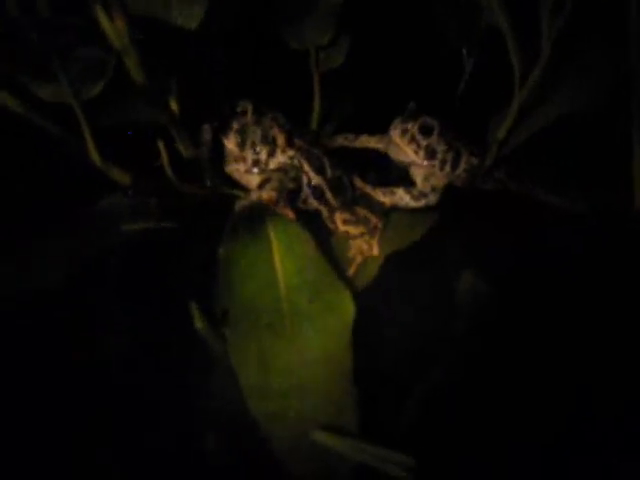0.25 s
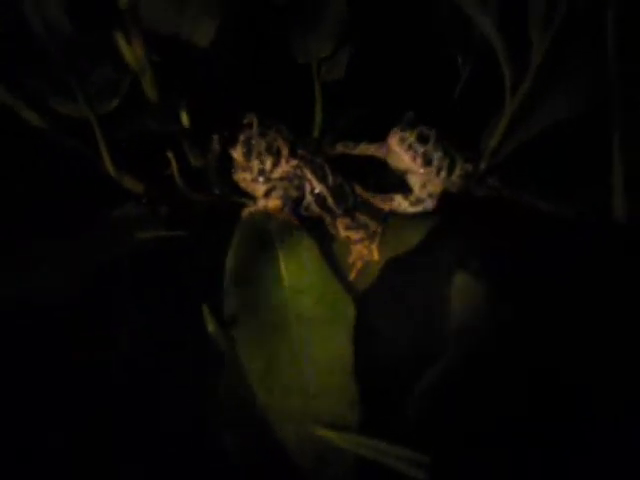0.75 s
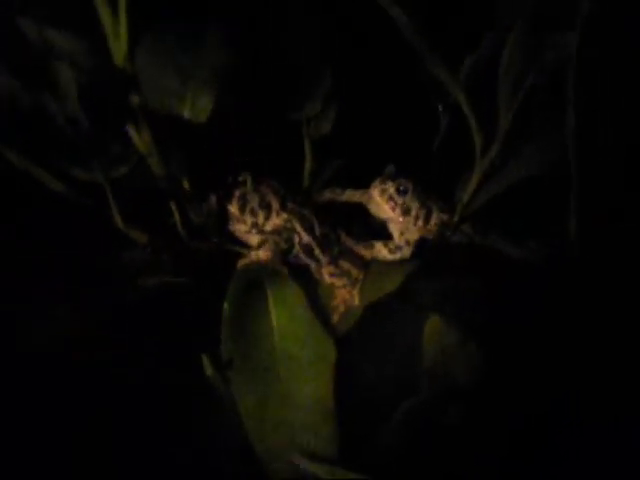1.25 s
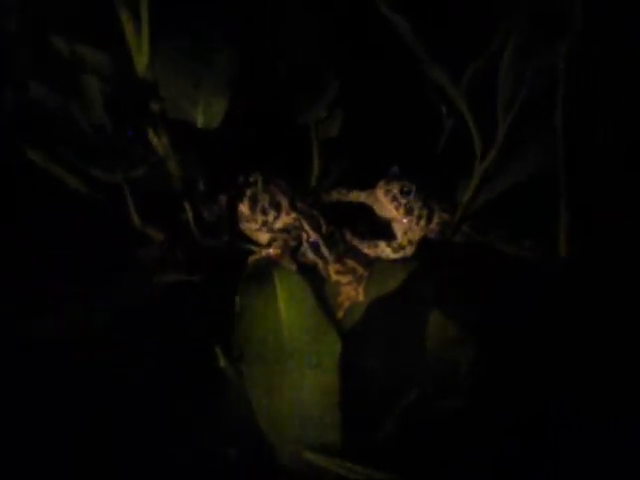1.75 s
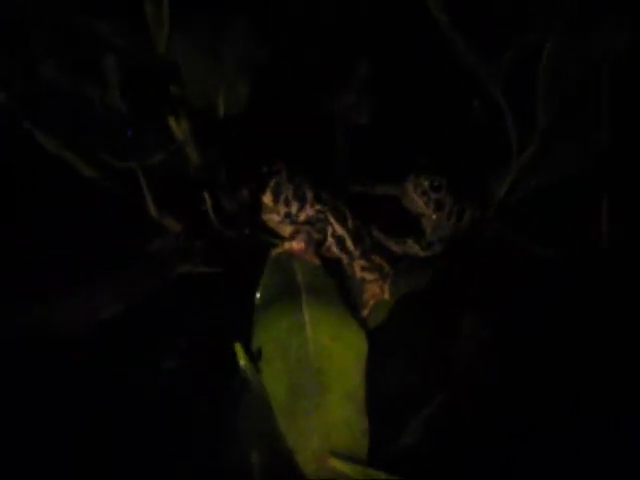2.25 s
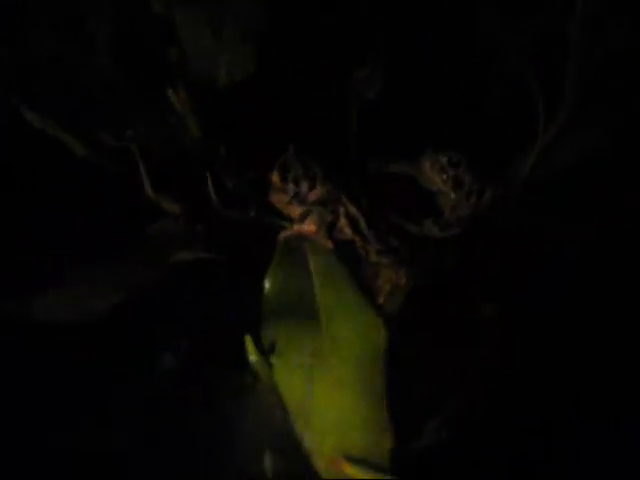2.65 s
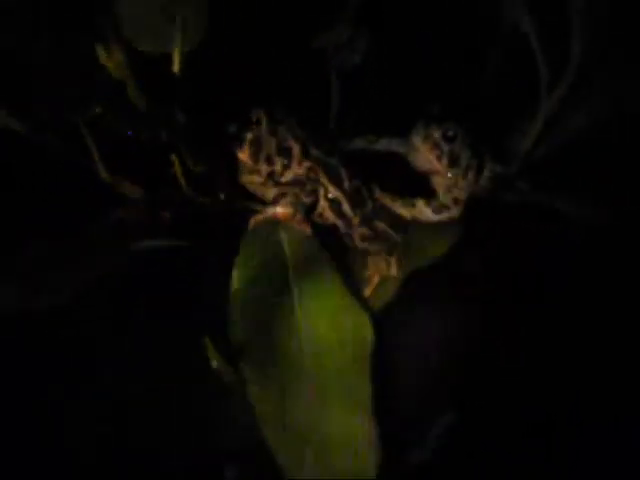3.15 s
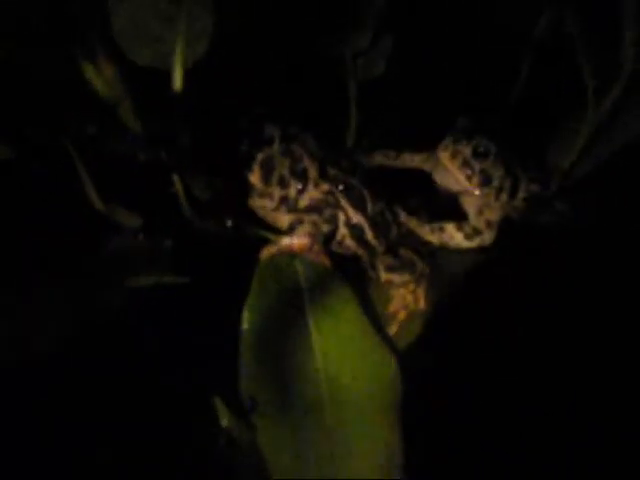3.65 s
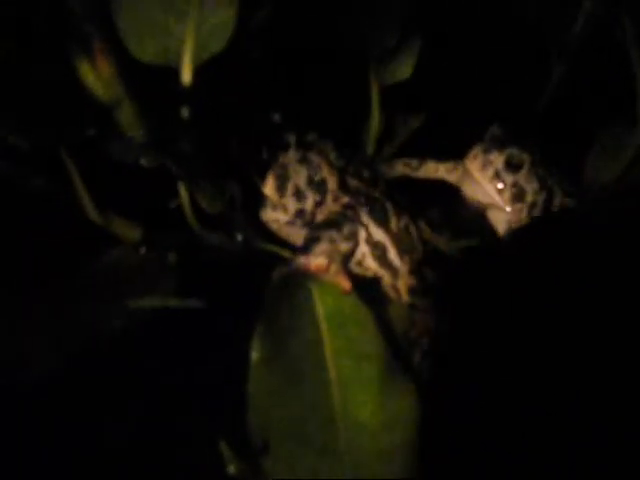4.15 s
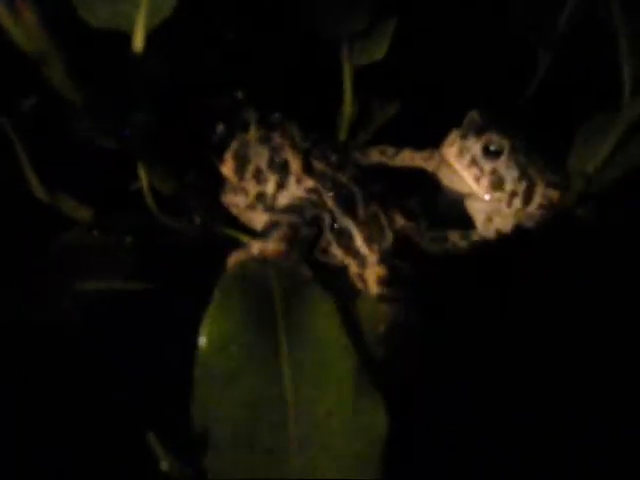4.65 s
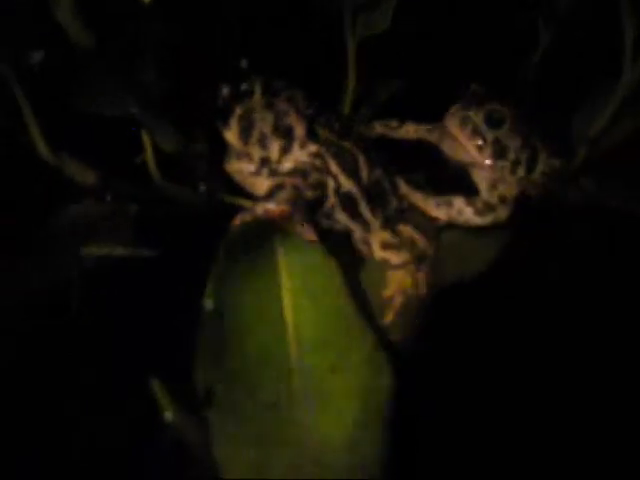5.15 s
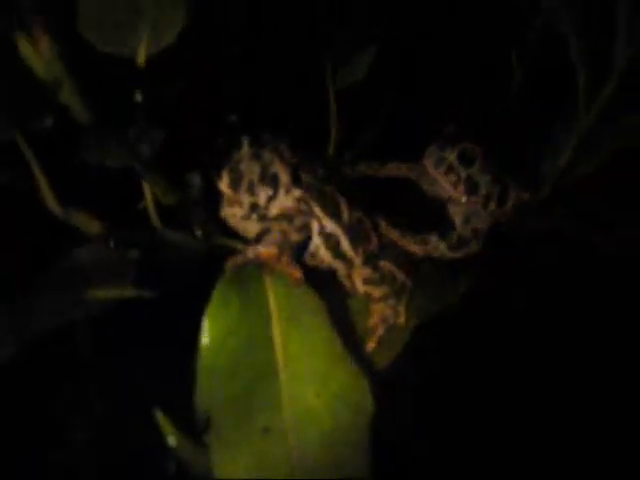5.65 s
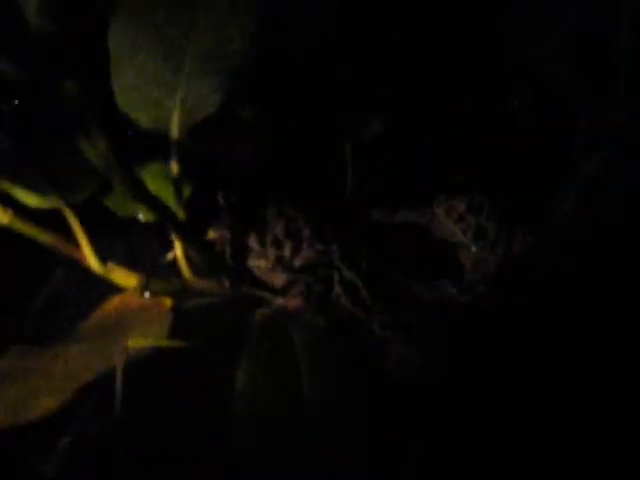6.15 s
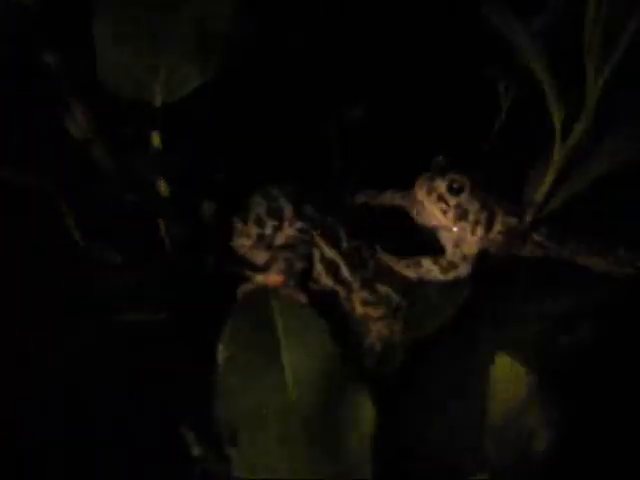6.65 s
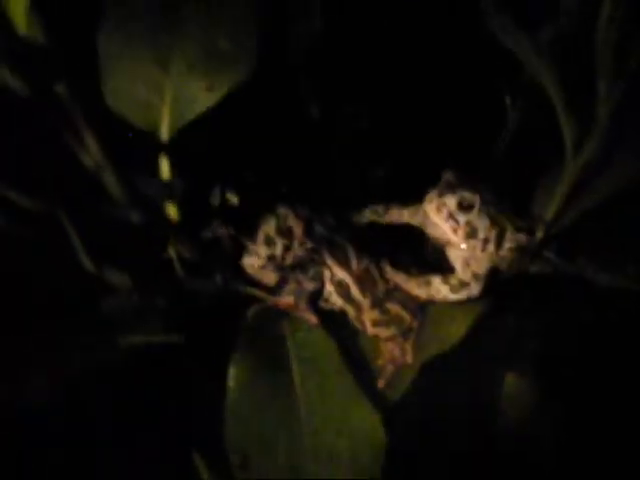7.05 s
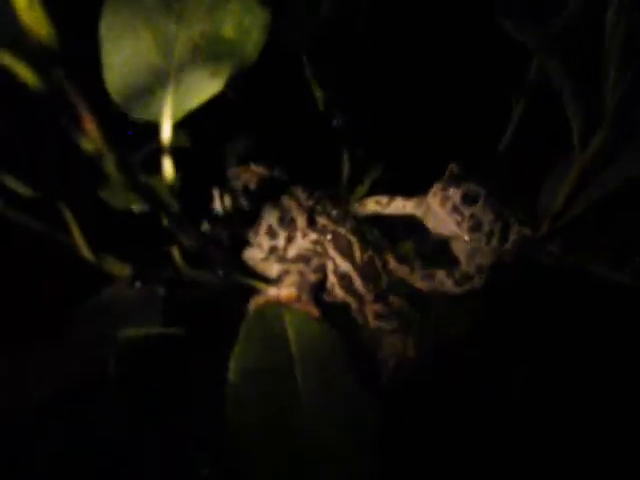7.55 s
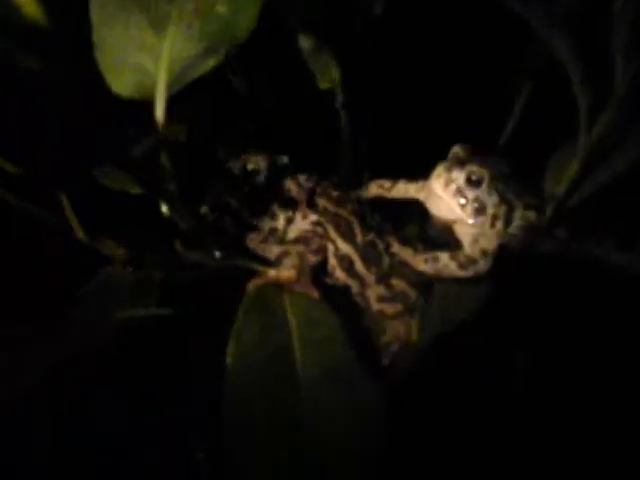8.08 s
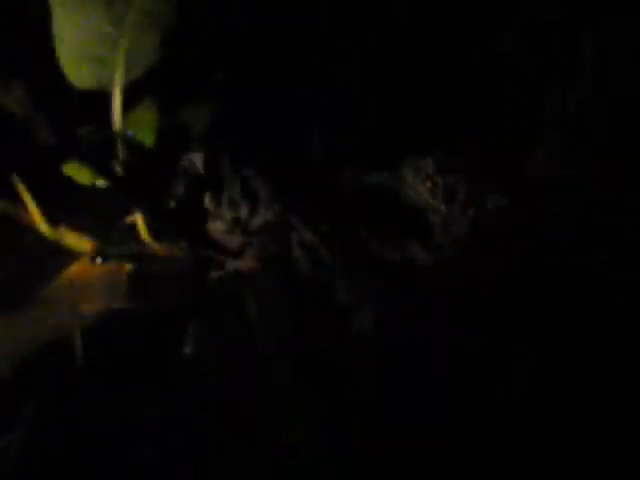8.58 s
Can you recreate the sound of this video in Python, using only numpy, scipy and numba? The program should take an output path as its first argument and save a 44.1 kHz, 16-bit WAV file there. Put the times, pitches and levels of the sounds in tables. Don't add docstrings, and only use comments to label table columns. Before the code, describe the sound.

A dense, unbroken toad buzz fills the open night air, close and loud, made of overlapping rapid chugs at slightly different pitches. A fourth toad joins briefly early on. Quick frog creaks, far-off trilling, soft bleats and tiny low croaks are half hidden beneath. A cheap small-camera microphone adds soft overload, grainy hiss-like grit, mirrored treble and faint wind bumps.

```python
import sys
import numpy as np
from scipy import signal
from scipy.io import wavfile
from scipy.ndimage import uniform_filter1d, map_coordinates
from numba import njit

SR = 44100
rng = np.random.default_rng(int(sys.argv[2]) if len(sys.argv) > 2 else 0)


def bounce(signal):
    frames = np.transpose(np.atleast_2d(signal))
    limited = np.clip(frames, -1, 1)
    pcm = np.round(limited * 32767).astype(np.int16)
    wavfile.write(sys.argv[1], SR, pcm)


def gain_from_db(level_db):
    decades = np.asarray(level_db, float) / 20
    return 10 ** decades


N = 388962


@njit
def ring(s, hz, gain, turn, rise_ms, fall_ms, glide):
    out = np.zeros(N)
    for k in range(len(s)):
        middle = int(s[k] * SR)
        first = max(middle - int(rise_ms * SR / 300), 0)
        last = min(middle + int(fall_ms * SR / 150), len(out))
        for i in range(first, last):
            ms = (i / SR - s[k]) * 1000
            shape = np.exp(-.5 * (ms / rise_ms) ** 2) if ms < 0 else 1 / np.cosh(ms / fall_ms)
            turns = hz[k] / 1000 * ms * (1 + .5 * glide * min(max(ms, -4.), 4.)) + turn[k]
            out[i] += gain[k] * shape * np.sin(2 * np.pi * turns)
    return out


def add(out, s, hz, db, rise_ms, fall_ms, glide):
    s, hz, db = (np.array(v, float) for v in np.broadcast_arrays(s, hz, db))
    phase = rng.random(len(s))
    out += ring(s, hz, gain_from_db(db), phase, 1. * rise_ms, 1. * fall_ms, 1. * glide)


def bell(s, half_s):
    return np.exp(-((np.arange(N) / SR - s) / half_s) ** 2)


def level(x, db):
    return x * gain_from_db(db) / np.sqrt(np.mean(x ** 2))


def field(x, t60_s, wet_db):
    t = np.arange(SR // 3) / SR
    decay = np.exp(-np.log(1000) * t / t60_s)
    spray = rng.standard_normal(len(t)) * decay * np.minimum(t / .004, 1)
    spray /= np.sqrt(np.sum(spray ** 2))
    return x + gain_from_db(wet_db) * signal.oaconvolve(x, spray)[:N]


def beat(pace, count):
    padded = np.pad(pace, 6, mode="reflect", reflect_type="odd")
    s = map_coordinates(padded, [6 + np.arange((len(pace) - 1) * count + 1) / count])
    return s + .0008 * rng.standard_normal(len(s))


def toad(chugs, pulses, db, shift=0.99):
    out = np.zeros(N)
    ms, hz, rel_db = np.transpose(pulses)
    chance = rng.standard_normal((len(chugs), len(ms), 3))
    s = (np.array(chugs)[:, None] + ms / 1000 + .00025 * chance[..., 0]).ravel()
    hz = (shift * hz * (1 + .015 * chance[..., 1])).ravel()
    chug_db = db[:, None] + 1.1 * chance[:, :1, 1]
    db = (chug_db + rel_db + 1.6 * chance[..., 2]).ravel()
    add(out, s, hz, db, rise_ms=1.0, fall_ms=.68, glide=-.003)
    add(out, s - .0012, 1.14 * hz, db - 18.5, rise_ms=.45, fall_ms=.55, glide=0)
    return out


# offset in ms, vocal sac resonance in Hz, level in dB.
HIGH_PULSES = [(-8.5, 2500, -1), (-3, 2540, 0), (3, 2510, 0), (8.5, 2450, -3), (14.5, 2400, -11.5)]
LOW_PULSES = [(-10.5, 2250, -3), (-4, 2320, 0.5), (3.5, 2220, -3), (10.5, 2090, -10)]
MIDDLE_PULSES = [(-9.5, 2360, -7), (-3, 2400, 0), (3, 2370, -0.5), (9.5, 2320, -2), (15.5, 2260, -7)]
# time in seconds, then levels of high, low and middle toad in dB.
EFFORT = [(0, -15, -15, -15), (.9, -13, -11.5, -15.5), (1.701, -16, -12.5, -16), (2.5, -15.5, -11.5, -16),
          (3.6, -15.5, -13.5, -17.5), (4.9, -15, -12, -18.5), (5.599, -17, -12, -18),
          (7.3, -17.5, -12.5, -18.5), (7.8, -18, -13, -21), (8.82, -17, -12, -19.5)]
# middle of every tenth, seventh or ninth chug in seconds.
HIGH_PACE = [0.0367, 0.598, 1.1507, 1.7, 2.257, 2.8086, 3.375, 3.927, 4.499, 5.0613, 5.6172, 6.183, 6.7453,
             7.3066, 7.8635, 8.4197, 8.983]
LOW_PACE = [1.494, 2.0387, 2.5578, 3.0329, 3.4806, 3.9294, 4.3736, 4.8172, 5.2714, 5.7186, 6.1542, 6.5912,
            7.0279, 7.4653, 7.9018, 8.3295, 8.7672]
MIDDLE_PACE = [0.0607, 0.6061, 1.1616, 1.6962, 2.2161, 2.7476, 3.281, 3.8095, 4.34, 4.874, 5.4142, 5.954,
               6.478, 7.0042, 7.5378, 8.0588, 8.5728, 9.09]
BRIEF_PACE = [
    1.286,
    1.8,
]


def near_toads():
    s, high_db, low_db, middle_db = np.transpose(EFFORT)
    high = beat(HIGH_PACE, count=10)
    low = beat(LOW_PACE, count=7)
    middle = beat(MIDDLE_PACE, count=9)
    brief = beat(BRIEF_PACE, count=6)
    out = toad(high, HIGH_PULSES, np.interp(high, s, high_db))
    out += toad(low, LOW_PULSES, np.interp(low, s, low_db))
    out += toad(middle, MIDDLE_PULSES, np.interp(middle, s, middle_db))
    return out + toad(brief, MIDDLE_PULSES, np.full(len(brief), -14.5), shift=1.03)


# first click in seconds, last click in seconds, number of clicks, level in dB.
CREAKS = [(0.321, 0.691, 10, -32.5), (0.819, 1.108, 9, -30.5), (1.67, 2.007, 9, -31.5),
          (2.169, 2.396, 7, -31.5), (3.25, 3.575, 9, -31.5), (3.75, 3.928, 6, -36.5),
          (4.4884, 4.822, 9, -33), (5.021, 5.204, 6, -36.5), (5.727, 5.87, 5, -37),
          (5.959, 6.045, 3, -40.5), (6.342, 6.579, 7, -36), (6.88, 7.148, 8, -36.5), (7.451, 7.702, 8, -36),
          (7.948, 8.048, 4, -39), (8.09, 8.242, 5, -40), (8.66, 8.811, 5, -37)]


def creaks(count=2200):
    out = np.zeros(N)
    base_hz, rise_hz, swell_db, hurry = 3212, 397, 6, 1.2
    for first, last, clicks, db in CREAKS:
        share = np.linspace(0, 1, round(clicks))
        arch = (share - .6) ** 2
        place = share - hurry * ((share - .6) ** 3 + .6 ** 3) / 3
        chance = rng.standard_normal((12, 2))[:len(share)]
        s = first + (last - first) * place / place[-1] + .002
        hz = base_hz + rise_hz * np.sqrt(share) + 35 * chance[:, 0]
        click_db = db - 5.5 - swell_db * arch / 0.33 + 1.7 * chance[:, 1]
        add(out, s, hz, click_db, rise_ms=1.2, fall_ms=1.9, glide=-0.0062)
    when, pitch, loud = rng.random((count, 3)).T
    add(out, when * N / SR, 2950 + 850 * pitch ** 1.3, -48 - 7.0 * loud, rise_ms=.7, fall_ms=1.6, glide=-0.0029)
    return out


def trills(calls, slows, rises):
    out = np.zeros(N)
    for start, end, rate, hz, db in calls:
        s = start + np.arange(240) / rate
        s = s + slows / 2 * (s - start) ** 2 / (end - start)
        share = (s - start) / (end - start)
        chance = rng.standard_normal((len(s), 2))
        on = share < 1
        pulse_hz = hz * (1 + rises * np.sqrt(share)) * (1 + .017 * chance[:, 0])
        pulse_db = db - 2.5 + 1.8 * chance[:, 1]
        add(out, s[on], pulse_hz[on], pulse_db[on], rise_ms=2.3, fall_ms=2.3, glide=.008)
    return out


# start in seconds, end in seconds, pulses per second, pitch in Hz, level in dB.
BLEATS = [
    (1.088, 1.59, 50, 1090, -49),
    (2.598, 3.21, 53.5, 1170, -47.5),
    (7.46, 8.05, 50, 1151, -56),
    (8.245, 8.79, 50, 1190, -53.5),
    (8.245, 8.79, 47, 1389, -51),
    (4.6, 5.9, 50, 1251, -56.5),
]
WHOOP = [
    (1.52, 1.6, 89.7, 1614, -36.5),
]


def bleats():
    return trills(BLEATS, slows=.05, rises=0.096) + trills(WHOOP, slows=.01, rises=.25)


# middle in seconds, half length in seconds, depth in dB.
HUSHES = [
    (.5, .2, -10.5),
    (.9, 0.23, -3.5),
    (3, .25, -2.5),
    (4.1, .2, -3.5),
    (4.499, .2, -8.5),
    (5.4, .2, -2.5),
    (5.85, .25, -10.5),
]


def crowd(count=5):
    out = np.zeros(N)
    for pace, size, loud in rng.random((count, 3)):
        gaps = (1 + .012 * rng.standard_normal(170)) / (14.5 + 4.0 * pace)
        chugs = np.cumsum(gaps) - loud / 15
        out += toad(chugs, MIDDLE_PULSES, np.full(len(gaps), -7.0 * loud), shift=.94 + .13 * size)
    far = level(field(out, t60_s=.2, wet_db=-4), -31.5)
    return far * gain_from_db(sum(db * bell(s, half) for s, half, db in HUSHES))


# start in seconds, end in seconds, pulses per second, pitch in Hz, level in dB.
TRILLS = [
    (0, 2.7, 45.7, 1717, -43.5),
    (2.4, 5.9, 55.93, 1711, -39.5),
    (3.3, 6.8, 45.2, 1678, -44),
    (5.9, 8.82, 47.67, 1834, -34.5),
    (7, 8.82, 31.1, 1771, -40.5),
    (0, 6.7, 40.9, 1901, -41.5),
]


def distant_trills():
    return trills(TRILLS, slows=.03, rises=-.012)


# start in seconds, length in seconds, pulses per second, mouth in Hz, level in dB.
CROAKS = [
    (1.601, .07, 77, 694, -51),
    (2.082, .09, 94, 833, -50),
    (5.196, .07, 90, 500, -55.5),
    (5.8, .06, 83, 610, -56),
]


def croaks():
    out = np.zeros(N)
    for start, length, rate, mouth_hz, db in CROAKS:
        s = np.arange(start, start + length, 1 / rate)
        add(out, s, 198, db, rise_ms=5.8, fall_ms=3.3, glide=0)
        add(out, s[2:], mouth_hz, db + 7.5, rise_ms=0.43, fall_ms=0.94, glide=0)
    return out


# middle in seconds, half length in seconds, level in dB.
GUSTS = [(0, .06, -50), (0.319, 0.069, -62), (.64, .06, -59.5), (0.975, 0.17, -49), (1.251, 0.083, -47.5),
         (1.566, 0.15, -48), (1.91, .07, -47.5), (2.133, 0.097, -52.5), (2.642, 0.098, -44),
         (3.15, 0.24, -56), (3.804, .08, -48), (5.18, 0.14, -62.5), (5.818, .06, -64.5),
         (6.359, .14, -57.5), (6.84, .09, -53), (7.14, .13, -56.5), (7.477, .05, -53),
         (7.884, 0.059, -57.5), (8.246, .17, -53), (8.616, 0.054, -50.5), (8.82, .06, -59)]
# time in seconds, peak level in dB, pitch in Hz.
BUMPS = [(1.005, -44, 108.7), (1.249, -34.5, 107.4), (1.355, -40.5, 847.8), (1.71, -45, 130),
         (1.905, -44, 131), (2.551, -43.5, 120.6), (2.615, -35, 138), (2.629, -33, 175),
         (2.7, -34.5, 153.4), (.48, -43, 290), (3.741, -40.5, 121), (3.789, -41.5, 139),
         (3.828, -40.5, 109), (0.312, -51.5, 316)]


def wind():
    puff_db = np.repeat(rng.standard_normal(N // 700 + 1), 700)
    puffs = gain_from_db(6.5 * uniform_filter1d(puff_db, 500)[:N])
    band = signal.butter(1, [35, 110], "bandpass", fs=SR, output="sos")
    rumble = signal.sosfilt(band, rng.standard_normal(N))
    rumble = signal.sosfilt(signal.butter(2, 190, fs=SR, output="sos"), puffs * rumble)
    calm_db = -72
    blow = gain_from_db(calm_db) + sum(gain_from_db(db - 4.0) * bell(s, half) for s, half, db in GUSTS)
    out = rumble / np.sqrt(uniform_filter1d(rumble ** 2, SR // 6)) * blow
    for s, db, hz in BUMPS:
        add(out, [s], hz, db, rise_ms=14 / hz ** 0.33, fall_ms=19 / hz ** 0.42, glide=0)
    return out


def night_air():
    return level(signal.lfilter([1], [1, -.8], rng.standard_normal(N)), -64)


def scene():
    near = field(near_toads() + creaks() + bleats(), t60_s=.11, wet_db=-15.5)
    others = field(distant_trills(), t60_s=.2, wet_db=-6.0)
    return (near + crowd() + others + croaks() + wind() + night_air())[None]


def sample_and_hold(x):
    block, first_slip_s = 11024, .2407
    step = 0.0093
    place = np.arange(N)
    place = place + (place - int(first_slip_s * SR)) // (block - 1) + 1
    ticks = np.arange(0, place[-1] + 1, 4) * (block - 1) / block
    samples = np.floor(map_coordinates(x, [ticks], mode="nearest") / step) * step
    return samples[place // 4]


def roll_off(x):
    return signal.sosfilt(signal.butter(12, 15960, fs=SR, output="sos"), x)


def record(dry):
    ceiling = .355
    x = ceiling * np.tanh(gain_from_db(5.5) * dry[0] / ceiling)
    x = signal.sosfiltfilt(signal.butter(6, 5200, fs=SR, output="sos"), x)
    held = sample_and_hold(x)
    held = signal.sosfiltfilt(signal.butter(8, 15000, fs=SR, output="sos"), held)
    return roll_off(held[None])


dry = scene()
out = record(dry)
bounce(out)
```